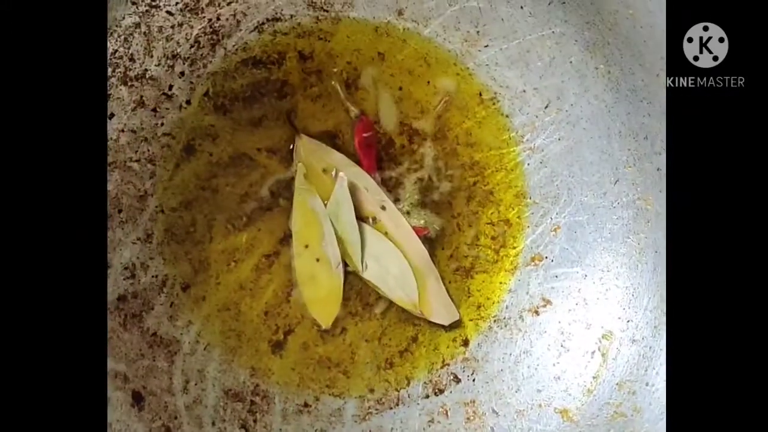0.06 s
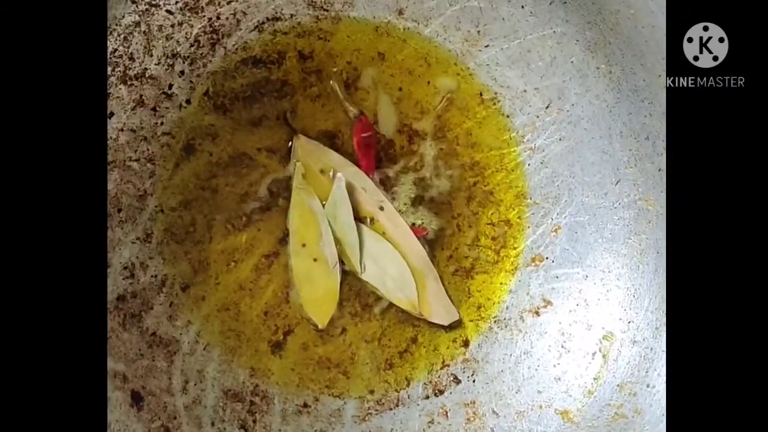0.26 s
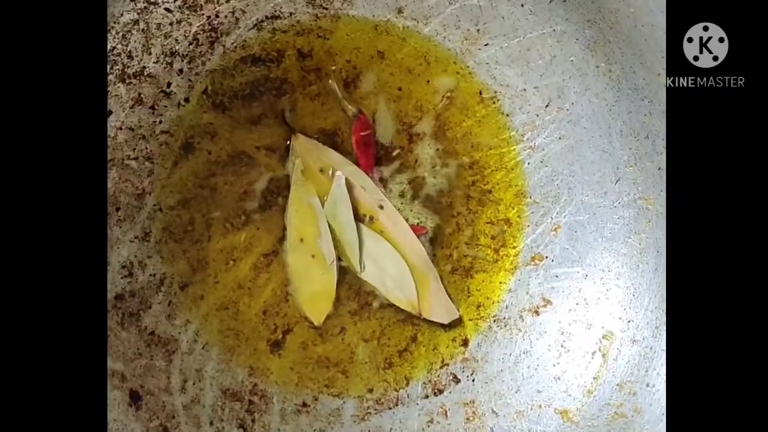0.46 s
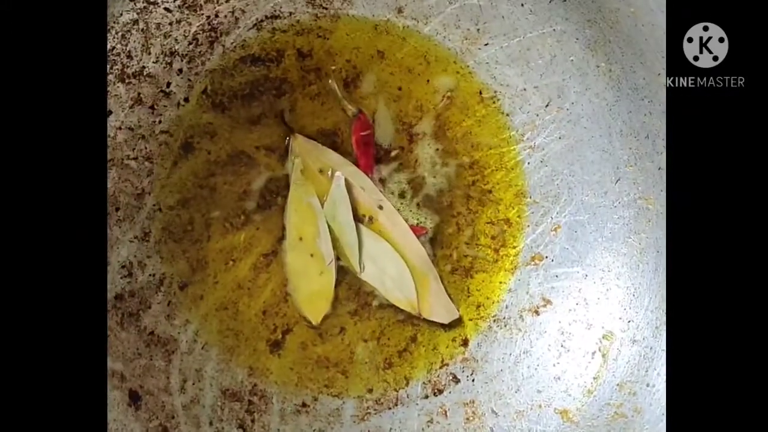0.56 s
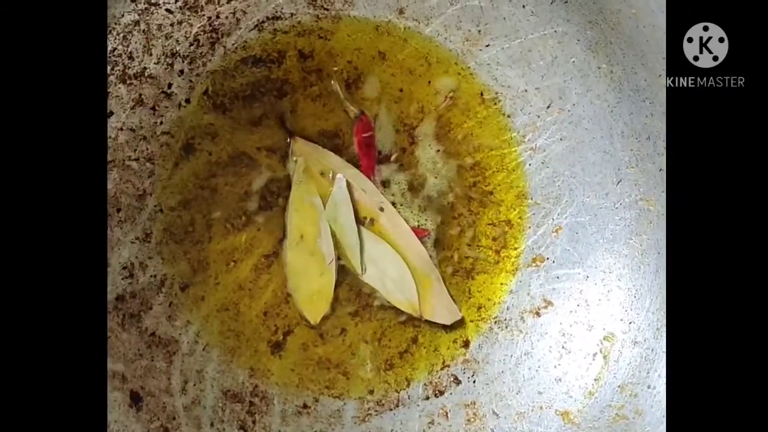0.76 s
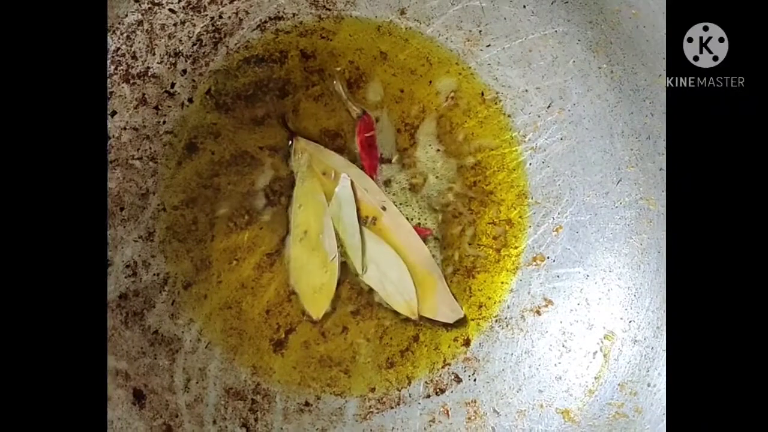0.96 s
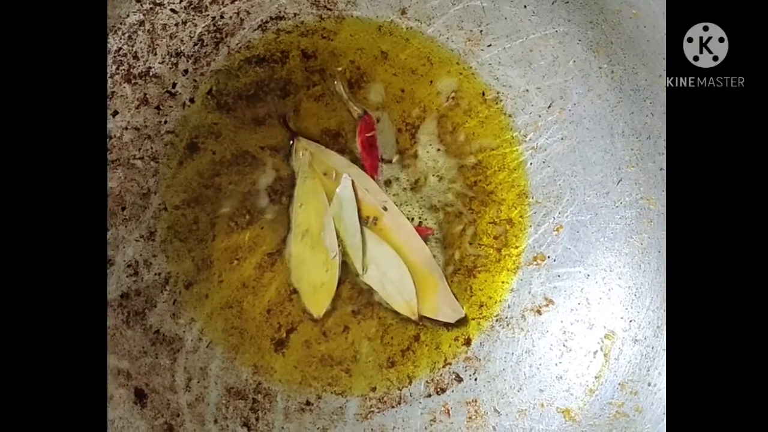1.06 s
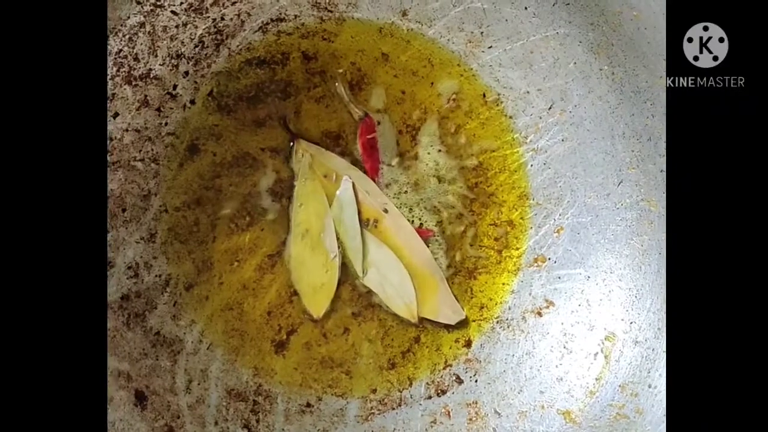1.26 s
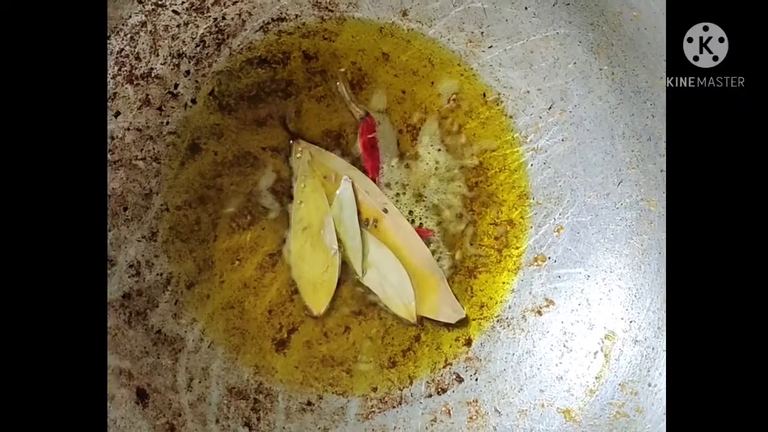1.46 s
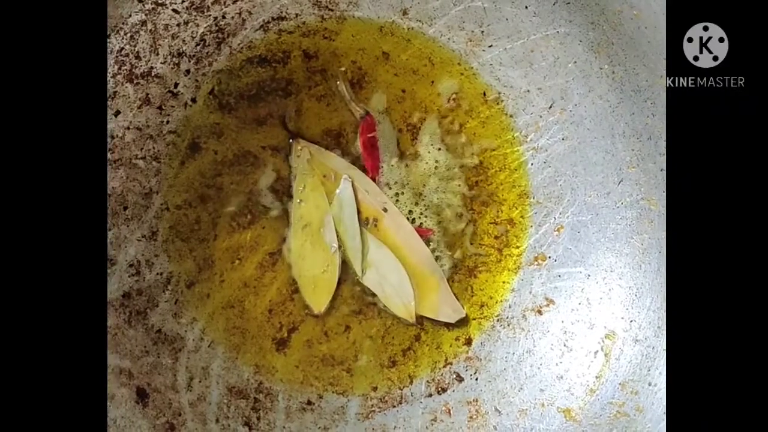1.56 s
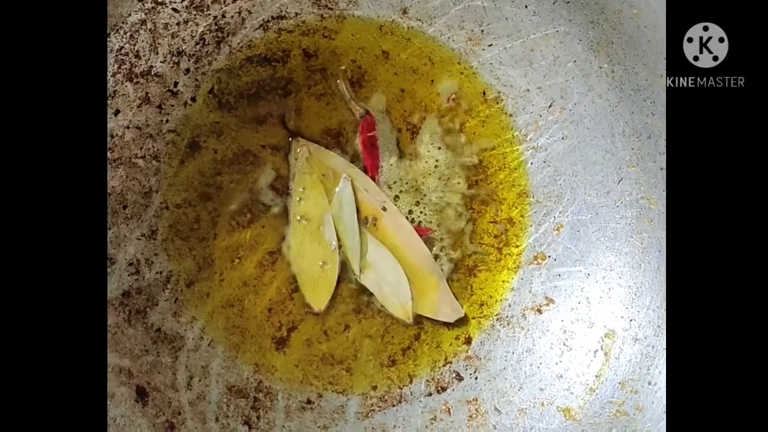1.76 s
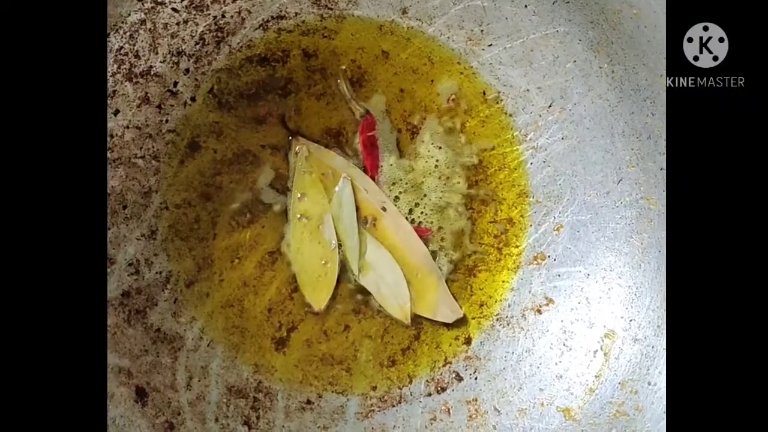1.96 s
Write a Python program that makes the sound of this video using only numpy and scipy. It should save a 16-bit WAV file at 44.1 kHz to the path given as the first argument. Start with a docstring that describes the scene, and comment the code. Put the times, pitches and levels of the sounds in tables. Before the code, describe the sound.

Whole spices and dried chilli fry in hot oil in a metal pan, hissing finely while bubbles pop in uneven clusters and droplets spit; quiet burner rumble below, small kitchen, close stereo microphones.

```python
"""In a kitchen, whole spices and dried chillies fry in hot oil in a metal pan, close to two microphones.
Steam bubbles burst as short, rising pulses that ring the pan; some pops add a low thump.
Droplets spit as short, fading noises, and many random small pulses crackle and fizz.
Countless tiny bubbles hiss as shaped noise; the burner and the kitchen rumble and hum underneath."""
import sys
import numpy as np
from scipy import signal
from scipy.io import wavfile
from scipy.ndimage import uniform_filter1d

SR = 44100
rng = np.random.default_rng(int(sys.argv[2]) if len(sys.argv) > 2 else 0)


def volts(x):
    """Linear amplitude factor 10**(x/20) for a level x in dB, scalar or array-like."""
    e = np.asarray(x, float) / 20
    return 10 ** e


def dump_mix(stems):
    """Bounce the given channels to the path in sys.argv[1] as a 16-bit WAV at rate SR."""
    frames = np.atleast_2d(stems).T  # one column per channel
    limited = np.clip(frames, -1, 1)  # hard clip at full scale
    pcm = np.round(limited * 32767).astype(np.int16)
    wavfile.write(sys.argv[1], SR, pcm)


N = 88200  # samples: two seconds

# Levels of close sounds are those before the pan, the room and the microphones colour them.
# Steam bubbles bursting. Each row: start in seconds, level in dB, bubble radius in mm,
# level of the spray of droplets in dB.
BUBBLE_POPS = [(0.033, -37, 1.36, -56), (0.043, -32.5, 1.2, -50), (0.069, -31.5, 1.42, -56),
               (0.0763, -24, 2.1, -35), (0.0837, -41, 1.2, -37), (0.0965, -26.5, 1.4, -38),
               (0.1076, -33.5, 1.25, -49), (0.1146, -33, 1.15, -51), (0.1233, -30, 1.3, -55),
               (0.135, -40, 1.8, -61), (0.163, -34, 1.15, -49), (0.1971, -30, 1.09, -31.5),
               (0.2124, -10.5, 1.62, -36), (0.2181, -8.5, 1.97, -30), (0.2206, -8.5, 1.526, -39),
               (0.2239, -11.5, 1.664, -25.5), (0.2587, -25, 1.25, -38), (0.2678, -24.5, 1.68, -30),
               (0.2909, -16, 1.38, -30), (0.3163, -24.5, 1.46, -41), (0.323, -31.5, 1.2, -34),
               (0.38, -20, 1.41, -48), (0.3875, -20, 1.36, -27.5), (0.3914, -41, 0.87, -50),
               (0.43, -37, 1.42, -47), (0.4649, -25, 1.27, -27), (0.4773, -24.5, 1.29, -26),
               (0.494, -37, 1.3, -32), (0.505, -42, 1.7, -54), (0.5518, -31, 0.94, -42),
               (0.5565, -11, 1.575, -29), (0.5744, -14.5, 1.62, -28.5), (0.719, -28, 0.51, -40),
               (0.728, -29.5, 1.41, -45), (0.751, -25, 1.26, -31), (0.8379, -12.5, 1.67, -36),
               (0.8413, -14.5, 1.57, -40), (0.8575, -29, 1.9, -63), (0.8718, -35.5, 1.07, -50),
               (0.931, -16, 1.73, -40), (0.987, -34.5, 1.21, -53), (1.0845, -18.5, 1.15, -20.5),
               (1.0903, -32, 0.96, -35), (1.094, -6, 1.494, -22), (1.1165, -21, 1.63, -26.5),
               (1.17, -13, 1.2, -28.5), (1.2, -35, 0.72, -34), (1.2432, -18, 1.19, -23.5),
               (1.4046, -42, 1.44, -37), (1.4209, -22.5, 1.41, -28.5), (1.6426, -8.5, 1.604, -28.5),
               (1.651, -20, 1.54, -27), (1.6762, -19.5, 1.34, -34), (1.714, -18.5, 1.82, -32),
               (1.764, -49, 0.45, -30), (1.7836, -33.5, 1.26, -28.5), (1.838, -24.5, 1.39, -21.5),
               (1.9578, -31, 1.18, -33), (1.9768, -23.5, 1.31, -38)]
# Low, dull thumps under some of the pops. Each row: start in seconds, level in dB.
LOW_THUMPS = [(0.1234, -16.5), (0.2178, -16.5), (.2915, -23.5), (.3810, -20.5), (0.5562, -14.5),
              (.8380, -16), (0.9332, -21.5), (1.119, -21), (1.4214, -26.5), (1.643, -24.5), (1.712, -36),
              (1.2431, -32)]
# Single droplets spitting. Each row: start in seconds, level in dB, pitch in Hz,
# time to fade by 60 dB in seconds.
DROPLET_SPITS = [(.5099, -15.5, 11160, 0.01), (.5753, -19, 3470, 0.0075), (.6172, -25, 9500, 0.015),
                 (.6710, -13, 14500, 0.012), (.8710, -12, 11400, 0.0074), (1.1693, -17, 12400, 0.0067),
                 (1.2432, -29, 3720, 0.014), (1.6763, -29.5, 6940, 0.038), (1.7834, -21.5, 6570, 0.075),
                 (1.8383, -34.5, 7230, 0.15)]
# The pan's ringing tones, varied a little at random in use. Each row: middle pitch in Hz,
# middle level in dB, time to fade by 60 dB in seconds.
PAN_RINGS = [(2235, -38.5, 0.042), (2680, -57, 0.0067), (2717, -46.5, 0.012), (2870, -43.5, 0.009),
             (3270, -43, 0.023)]
# Air ringing in the pan's bowl. Each row: pitch in Hz, left level in dB, right level in dB,
# time to fade by 60 dB in seconds, how far the right side leads in cycles.
BOWL_RINGS = [(1611, -35, -27.5, 0.029, 0.017), (1983, -37, -34.5, 0.02, 0.38)]
# Echoes off pan wall and stove top. Each row: middle delay in seconds, level in dB.
NEAR_ECHOES = [(.0029, -17), (.0040, -19.5)]
# Colour of each microphone for close sounds. Each row: frequency in Hz, gain in dB.
LEFT_MIC_COLOUR = [(200, -8.5), (1000, -12.5), (1500, 0.5), (1660, 1), (2000, 0), (2600, 9), (3200, 6),
                   (4000, 1.5), (5000, -9), (5700, -13), (6500, -7), (7200, -9.5), (10000, -15),
                   (15500, -16)]
RIGHT_MIC_COLOUR = [(200, -13.5), (1000, -11.5), (1400, -9.5), (1700, 1.5), (2000, -15.5), (2300, -28.5),
                    (2480, -28.5), (3000, 1), (4000, -0.5), (5000, 0.5), (5700, -7), (7200, -6),
                    (9000, -24.5), (12000, -20.5), (15500, -23)]
# How busy the crackle is. Each row: time in seconds, change of level in dB.
CRACKLE_SWELL = [(0, 6), (.35, 6), (.65, -7), (1, 3), (1.3, -2.5), (1.55, -5), (2, -0.5)]
# Tone of the tiny-bubble hiss at each microphone. Each row: frequency in Hz, relative level in dB.
LEFT_HISS_TONE = [(400, -7.5), (1000, -8.5), (1600, -4), (2200, 4), (3200, 0.5), (4000, -3), (4600, -7),
                  (5700, -29.5), (6400, -15.5), (7200, -0.5), (9000, -5), (12000, -3.5), (15000, -0.5),
                  (15700, -8)]
RIGHT_HISS_TONE = [(400, -19), (1000, -8), (1600, -12.5), (2500, -9.5), (3500, -9), (4500, -4.5),
                   (5700, -48), (6500, -12), (7500, -8.5), (9000, 0), (11000, -7), (13000, -12.5),
                   (15000, -12.5), (15700, -64)]
# Tone of the low rumble. Each row: frequency in Hz, relative level in dB.
RUMBLE_TONE = [(30, -38), (48, -33), (62, -4.5), (100, -4), (180, -10), (250, -9.5), (370, -11.5),
               (550, -18), (800, -20), (1200, -25), (2000, -29)]
# How alike the rumble is on both sides. Each row: frequency in Hz, likeness from 0 to 1.
RUMBLE_LIKENESS = [(60, 0.94), (160, 0.76), (400, 0.91), (900, 0.56)]
# Fuzzy hums. Each row: pitch in Hz, average level in dB, width in Hz.
FUZZY_HUMS = [(74.6, -63, 5.1), (103, -74.5, 17), (144.6, -68, 21), (240, -69, 3.6), (368.4, -73, 3.7)]


def evened(x):
    """Scale a sound to an average (rms) level of 1."""
    return x / np.sqrt(np.mean(x ** 2) + 1e-20)


def read(points, hz):
    """Read a curve between its points, on a logarithmic pitch scale."""
    f, value = np.transpose(points)
    return np.interp(np.log(hz + 1), np.log(f + 1), value)


def add(mix, s, sound):
    """Add a sound to the mix from s seconds on, cut off at the end of the mix."""
    part = mix[round(s * SR):][:len(sound)]
    part += sound[:len(part)]


def causal(points, size=2048):
    """Turn a gain curve into a filter that reacts as early as it can (minimum phase)."""
    gain_db = read(points, abs(np.fft.fftfreq(size, 1 / SR)))
    log_gain = np.log(volts(gain_db))
    spectrum = np.exp(np.conj(signal.hilbert(log_gain)))
    return np.fft.ifft(spectrum).real[:size // 2]


def noise_pair(left, right, same, patch_db, flicker_db, size):
    """Two partly alike noises from random short-time spectra with drifting louder and softer patches."""
    hz = np.fft.rfftfreq(size, 1 / SR)
    frames = 4 * N // size + 6
    a, b, c, d, patches = rng.standard_normal((frames, len(hz), 5)).T
    patches = uniform_filter1d(patches, size=5, axis=0)  # smooth over pitch
    patches = evened(uniform_filter1d(patches, size=6, axis=1))  # smooth over time
    # The flicker moves all pitches together
    field_db = patch_db * patches + flicker_db * rng.standard_normal(frames)
    same = np.clip(read(same, hz), -1, 1)[:, None]
    shared, own = a + 1j * b, c + 1j * d
    spectra = np.array([shared, same * shared + np.sqrt(1 - same ** 2) * own])
    tone_db = np.array([read(left, hz), read(right, hz)])[:, :, None]
    spectra *= volts(tone_db + field_db)
    noise = signal.istft(spectra, nperseg=size, noverlap=size * 3 // 4)[1]
    return evened(noise[:, size:N + size])


def blip(hz, cycles, turn=0):
    """A bubble pulse: a bell-shaped swell of a few cycles whose pitch glides upward; peak 1."""
    glide = 0.022  # rise per cycle, as a share of the pitch
    u = np.arange(400) / SR * hz  # time counted in cycles
    swell = u * np.exp(-(u / cycles) ** 2)
    wave = swell * np.sin(2 * np.pi * (u + glide * u ** 2 / 2 + turn))
    return wave / abs(wave).max()


def grains(per_s, spread_db, low_hz, high_hz, cycles, count=16):
    """A random rain of bubble pulses; a few differ much more in size, by the spread, than the rest."""
    size_db = spread_db * np.minimum(rng.exponential(1, N), 3.5)
    size = volts(size_db) * (rng.random(N) < per_s / SR)
    kind = rng.integers(0, count, N)
    rain = np.zeros(N)
    for k, hz in enumerate(np.geomspace(low_hz, high_hz, count)):
        rain += signal.oaconvolve(size * (kind == k), blip(hz, cycles))[:N]
    return evened(rain)


def kitchen():
    """Low rumble of the burner and kitchen as patchy noise, with hums made of narrowly filtered noise."""
    low = volts(-57.5) * noise_pair(RUMBLE_TONE, RUMBLE_TONE, RUMBLE_LIKENESS, 4.5, 0, size=4096)
    for hz, db, width in FUZZY_HUMS:
        peak = signal.iirpeak(hz, hz / width, SR)
        low = low + volts(db) * evened(signal.lfilter(*peak, rng.standard_normal(N)))
    return low


def hiss():
    """Countless tiny bubbles blur into a patchy, flickering noise, nearly unlike on the two sides."""
    likeness = [(100, 0.028)]  # the same at every pitch
    return volts(-50.5) * noise_pair(LEFT_HISS_TONE, RIGHT_HISS_TONE, likeness,
                                   patch_db=2.5, flicker_db=1.2, size=512)


def fizz():
    """A fine, dense rain of high bubble pulses, a few much louder than the rest."""
    return volts(-45) * grains(5900, spread_db=8, low_hz=7530, high_hz=11100, cycles=5.2)


def spray():
    """Droplets thrown up by each pop: a fast-fading burst of high noise."""
    low_hz, fade_s = 3560, 0.035
    mix, t = np.zeros(N), np.arange(2500) / SR
    high = signal.butter(3, low_hz, "high", fs=SR, output="sos")
    for s, _, _, db in BUBBLE_POPS:
        noise = signal.sosfilt(high, rng.standard_normal(len(t)))
        add(mix, s, volts(db - 60 * t / fade_s) * noise)
    return mix


def spits():
    """Single droplets spit: noise narrowed around one pitch, with a quick start and a fast fade."""
    rise_s = 0.00026
    mix, t = np.zeros(N), np.arange(2500) / SR
    for s, db, hz, fade_s in DROPLET_SPITS:
        grain = blip(hz, 1 + 0.011 * hz * fade_s)  # slower fades get longer grains
        narrow = evened(np.convolve(rng.standard_normal(len(t)), grain)[:len(t)])
        add(mix, s, volts(db - 60 * t / fade_s) * np.minimum(t / rise_s, 1) * narrow)
    return mix


def crackle():
    """Random small bubble pulses that swell and fade as the frying gets busier and calmer."""
    activity_db = np.interp(np.arange(N) / SR, *np.transpose(CRACKLE_SWELL))
    rain = grains(720, spread_db=-1.5, low_hz=1760, high_hz=2600, cycles=0.8)
    return volts(-62 + activity_db) * rain


def thump():
    """A dull push: a very short, low pulse, with the deepest part filtered away."""
    low_cut = signal.butter(2, 268, "high", fs=SR, output="sos")
    return signal.sosfilt(low_cut, blip(758, 0.69))


def low_thumps():
    """Low, dull thumps under some of the pops, each the same short pulse at its own level."""
    mix, push = np.zeros(N), thump()
    for s, db in LOW_THUMPS:
        add(mix, s, volts(db) * push)
    return mix


def pops(count):
    """Steam bubbles burst in turn at a few places; a larger bubble rings lower and for fewer cycles."""
    hz_times_mm = 3192  # a bubble's pitch is inverse to its radius
    rebound_s = 0.00152
    mix, push = np.zeros((count, N)), volts(-17) * thump()  # a faint push under every pop
    for k, (s, db, mm, _) in enumerate(BUBBLE_POPS):
        place = mix[k % count]
        pop = blip(hz_times_mm / mm, 2.0 / mm ** 0.81, 0.53 * rng.random())
        add(place, s, volts(db) * (pop + push))
        # The cavity left behind snaps shut: a second pulse, marked only after strong pops
        add(place, s + rebound_s, volts(1.91 * db + 4.5) * pop)
    return mix


def bursts(count=3):
    """Pops shared out over a few places in the pan; low thumps and crackle come from the first place."""
    mix = pops(count)
    mix[0] += low_thumps() + crackle()
    return mix


def pan_and_room():
    """For each side: direct sound, near echoes, ringing of pan and bowl, and a sparse kitchen tail."""
    t = np.arange(SR // 4) / SR
    out = np.zeros((2, len(t)))
    out[:, 0] = volts([-2.5, -9])  # left, right; the right microphone faces away
    for s, db in NEAR_ECHOES:
        delay = s * SR * (1 + 0.03 * rng.uniform(-1, 1, 2))
        out[[0, 1], delay.astype(int)] += volts(db)

    rise = np.clip(t / 0.00088, 0, 1) ** 2  # the rings build up within 0.88 ms
    for hz, db, fade_s in PAN_RINGS:
        turn, place, off = rng.standard_normal((3, 2, 1))
        hz = hz * (1 + 0.006 * off[0])  # each place detunes the ring a little
        wave = np.sin(2 * np.pi * (hz * t + 0.26 * turn))
        out += volts(db + 3 * place - 60 * t / fade_s) * wave * rise
    for hz, left_db, right_db, fade_s, lead in BOWL_RINGS:
        wave = np.sin(2 * np.pi * (hz * t + np.array([[0], [lead]])))
        out += volts(np.array([[left_db], [right_db]]) - 60 * t / fade_s) * wave * rise

    clicks = rng.choice([-1., 1.], out.shape) * (rng.random(out.shape) < 0.06)
    tail = clicks * volts(-60 * t / 0.16) * (t > 0.003)  # fades by 60 dB in 0.16 s
    return out + volts(-15) * tail / np.linalg.norm(tail[0])


def scene():
    """Mix the close sounds through the two microphones' colours, then add hiss and kitchen."""
    close = np.zeros((2, N))
    for burst in bursts():
        close += signal.fftconvolve(burst[None], pan_and_room(), axes=1)[:, :N]
    droplets = spray() + spits() + fizz()
    close += volts([[0], [-8]]) * droplets  # droplets are softer on the right
    left_lag = 5  # samples by which close sounds come later on the left
    mics = np.array([np.roll(causal(LEFT_MIC_COLOUR), left_lag), causal(RIGHT_MIC_COLOUR)])
    return signal.fftconvolve(close, mics, axes=1)[:, :N] + hiss() + kitchen()


def band_limit(x):
    """A steep low-pass at the top of the band."""
    return signal.sosfilt(signal.butter(12, 16600, fs=SR, output="sos"), x)


def record(dry):
    """Take away the highest treble, above about 15850 Hz, and return the finished sound."""
    edge = signal.firwin(401, 15850, window=("kaiser", 9), fs=SR)
    mix = signal.oaconvolve(dry, edge[None], "same")
    return band_limit(mix)


dry = scene()
out = record(dry)
dump_mix(out)
```